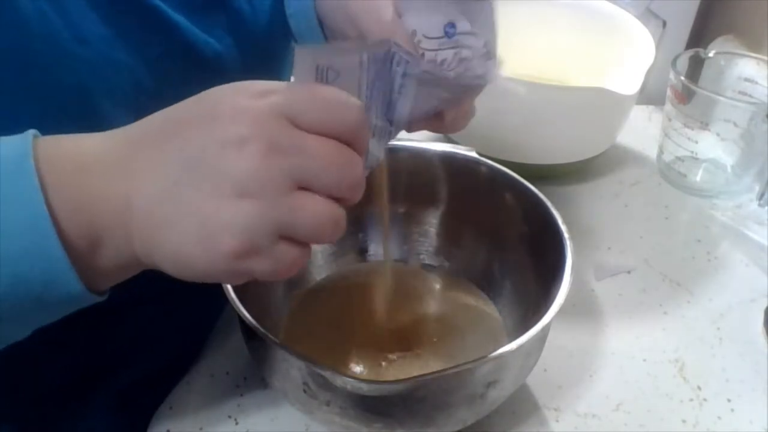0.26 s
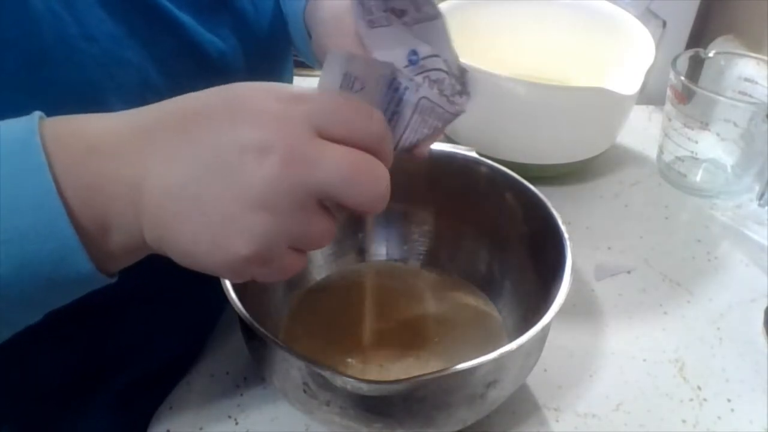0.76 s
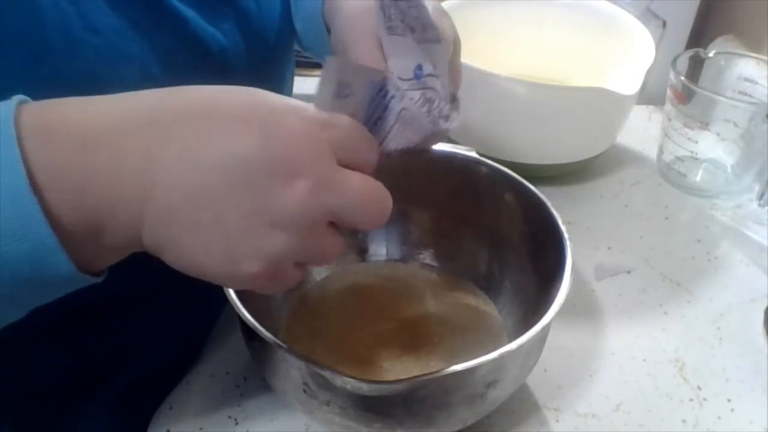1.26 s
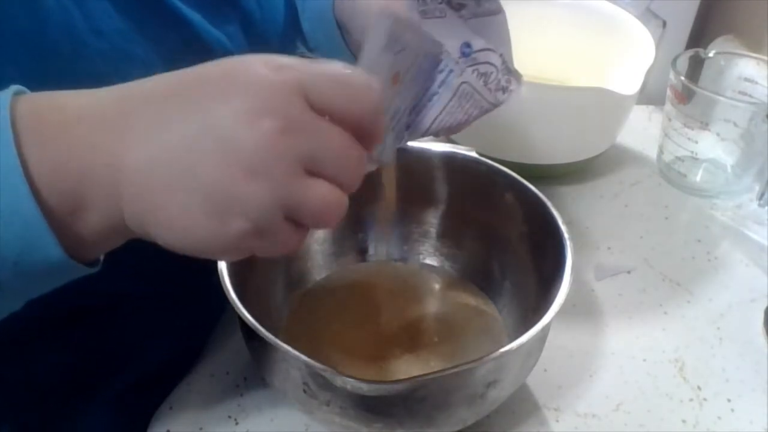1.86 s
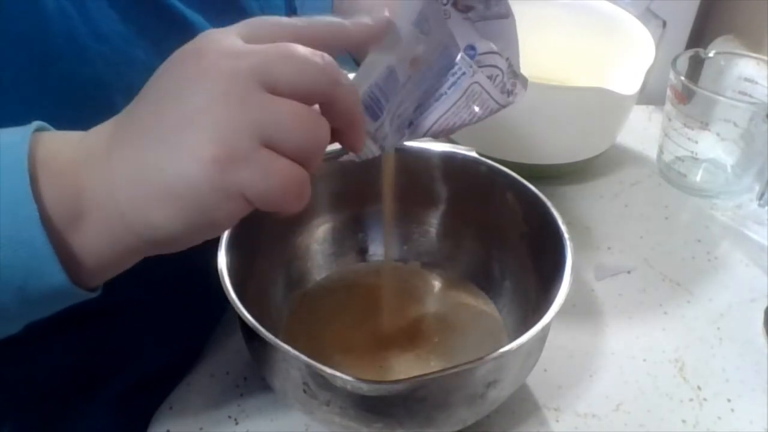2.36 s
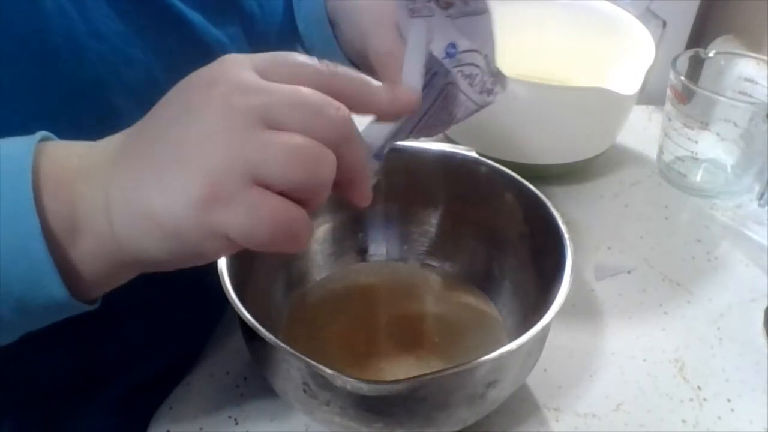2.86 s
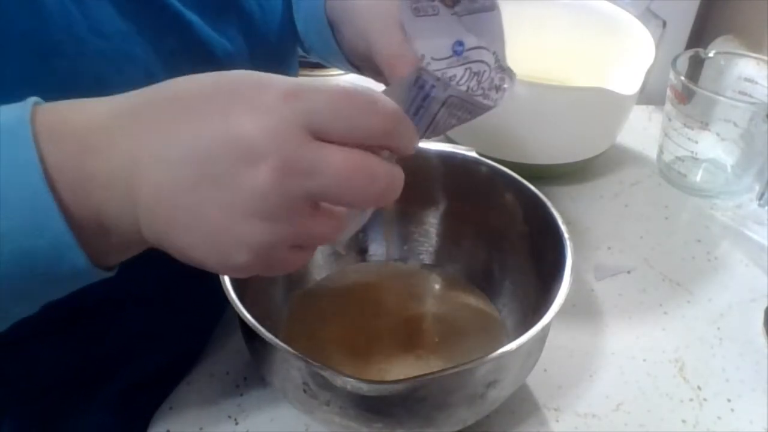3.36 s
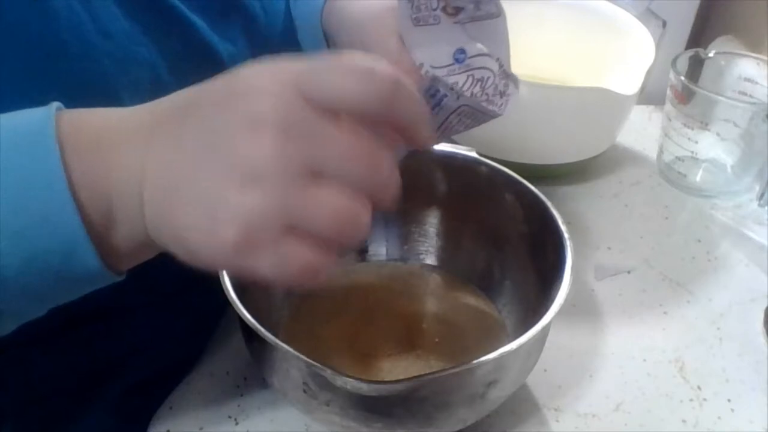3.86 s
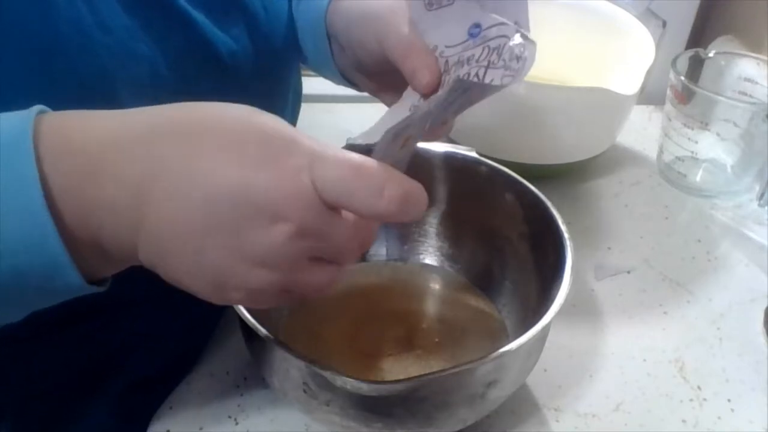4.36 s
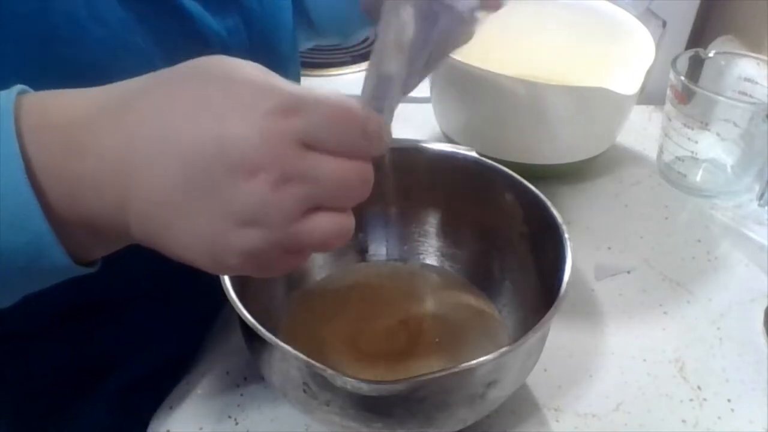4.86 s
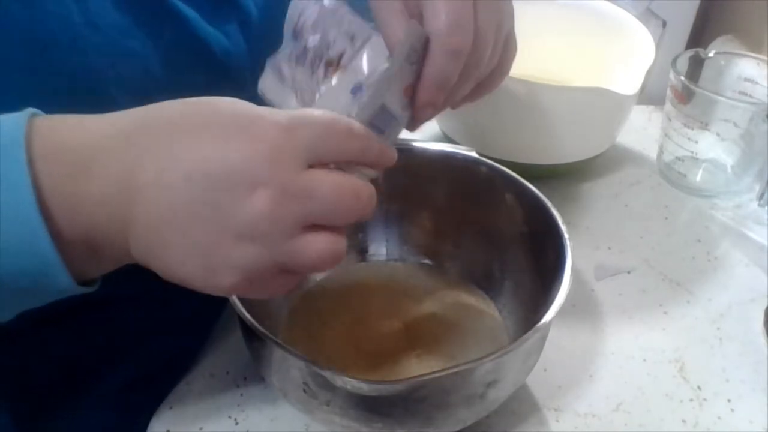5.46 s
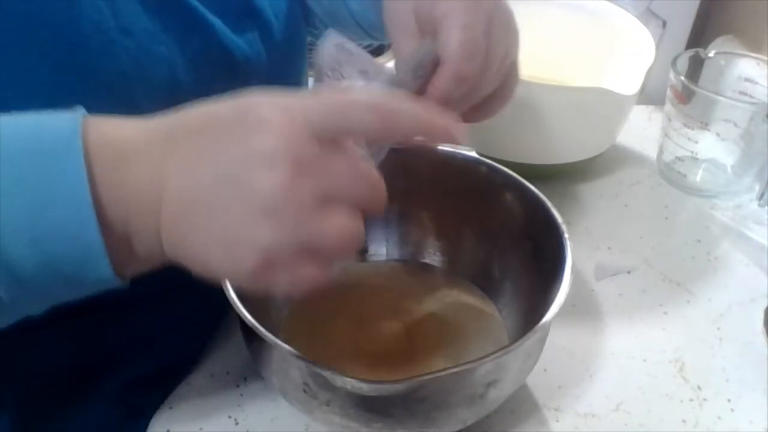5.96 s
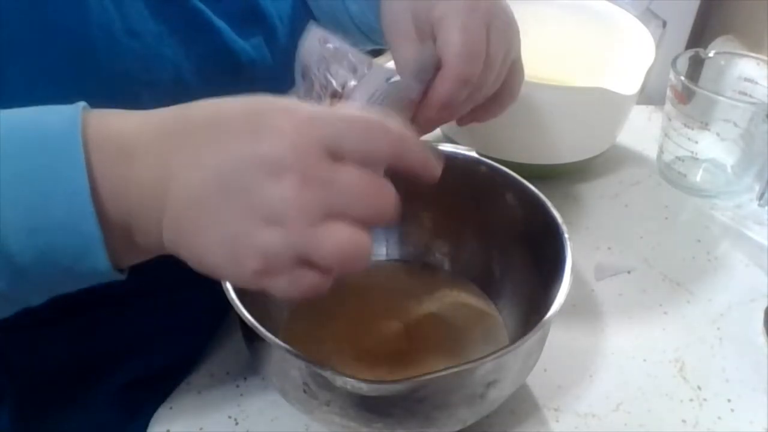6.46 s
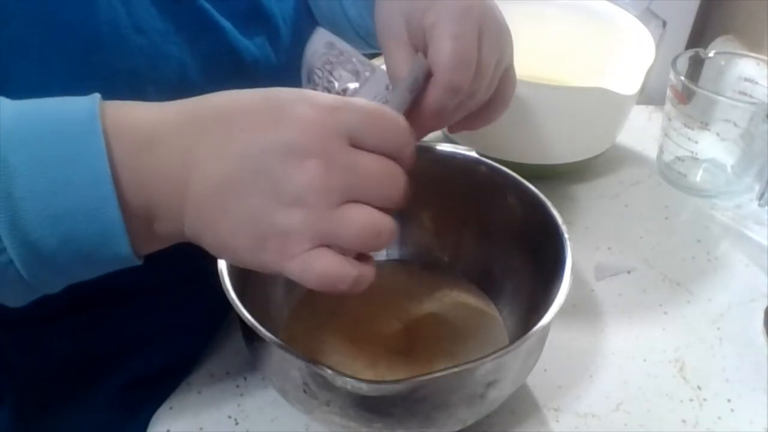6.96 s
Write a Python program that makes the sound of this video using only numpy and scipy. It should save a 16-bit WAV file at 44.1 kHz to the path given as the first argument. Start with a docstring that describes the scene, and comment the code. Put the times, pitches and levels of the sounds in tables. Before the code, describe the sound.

A paper packet is emptied over a steel bowl in a quiet kitchen, heard close through a microphone with no extreme highs. From 0 to 0.8 seconds crisp snaps crowd together over a fine hiss of falling granules, with a fleeting metallic tone cluster near 0.15 and a hollow pop at 0.3. Ticks thin out after 1.1, leaving faint hiss and rubbing. At 2 to 2.7 soft low finger bumps mix with sharp snaps, the loudest at 2.65 with a hollow pop. Scattered crackles run from 2.9 to 3.7, then it is nearly quiet until 4.9, apart from light rubbing around 4.2. From 5 the packet crumples, denser and softer from 5.4 to 6.1, with bumps near 5.9. At 6.35 a thud and crackle leave a tiny bowl ring around 1.2 kilohertz. Smaller crackles and rubs continue past 7 over faint low room noise.

```python
"""In a small kitchen, a paper yeast packet is squeezed empty over a steel mixing bowl, above faint room noise.
Each crease is noise and tiny clicks that swell quickly, snap and settle, coloured by the hollow of packet and bowl.
Squeezes swell filtered noise into rubbing and set off small folds at random; granules trickle as a dense,
faint hiss of tiny clicks. Decaying sines make the sides pop through and the steel rim sing once, a short
cluster of inharmonic sines swells and fades, and low noise puffs are fingers bumping the packet."""
import sys
import numpy as np
from scipy import signal
from scipy.fft import rfft, irfft
from scipy.io import wavfile
from scipy.ndimage import uniform_filter1d

SR = 44100
rng = np.random.default_rng(int(sys.argv[2]) if len(sys.argv) > 2 else 0)


def to_wav(sig):
    """Store sig (one row per channel, or 1-D mono) as 16-bit WAV at the path in sys.argv[1].

    Samples outside -1..1 are clipped; the rate is SR.
    """
    pcm = np.clip(np.atleast_2d(sig), -1, 1) * 32767
    pcm = np.round(pcm).astype(np.int16)
    wavfile.write(sys.argv[1], SR, pcm.T)  # frames by channels


N = 317696
TIME = np.arange(N) / SR
CRUMPLED_S = 4.7  # from here on the packet is crumpled
HOLD_DB = -77  # least effort: fingers never quite rest on the paper


def undb(db):
    """Decibels to gain."""
    return 10 ** (np.asarray(db) / 20)


def unit(x):
    """Scale to an rms of one."""
    return x / np.sqrt(np.mean(x ** 2) + 1e-30)


def band(x, lo_hz, hi_hz, order=3):
    """Causal band-pass."""
    sections = signal.butter(order, [lo_hz, min(hi_hz, .45 * SR)], "band", fs=SR, output="sos")
    return signal.sosfilt(sections, x)


def add(track, s, sound):
    """Mix a sound into a track from time s on."""
    start = int(round(s * SR))
    lo, hi = max(start, 0), min(start + len(sound), N)
    track[lo:hi] += sound[lo - start:hi - start]


def walk(rate_hz):
    """Slow random drift with an rms of one: held random steps, smoothed into ramps."""
    hold = int(SR / rate_hz)
    steps = np.repeat(rng.standard_normal(N // hold + 1), hold)
    return unit(uniform_filter1d(steps, hold)[:N])


def grains(shape, per_s, spread_db):
    """Random tiny clicks, mostly small, now and then large."""
    sizes = undb(spread_db * np.minimum(rng.exponential(size=shape), 4))
    strikes = rng.random(shape) < per_s / SR
    return unit(rng.standard_normal(shape) * sizes * strikes)


# spectrum of the quiet kitchen: (frequency [Hz], relative density [dB per Hz])
ROOM_SPECTRUM = [(15, -30), (25, -7), (150, -7), (314, -20), (556, -11), (759, -24), (815, -10.5),
                 (986, -28), (1220, -15.5), (1550, -29), (1710, -22), (2170, -23), (7500, -34), (9750, -87),
                 (16500, -120)]


def kitchen(level_db=-73, waver_db=0.2):
    """Steady room noise, shaped in frequency, whose level wavers a little."""
    hz, db = np.transpose(ROOM_SPECTRUM)
    bins = np.maximum(np.fft.rfftfreq(N, 1 / SR), 1)
    colour = undb(np.interp(np.log(bins), np.log(hz), db))
    noise = irfft(rfft(rng.standard_normal(N)) * colour, N)
    return unit(noise) * undb(level_db + waver_db * walk(23))


def walls(x, t60_s=0.11, wet_db=-25, dull_hz=3500):
    """A short, dull kitchen echo: the sound is smeared by a decaying tail of noise."""
    t = np.arange(SR // 2) / SR
    noise = band(rng.standard_normal(len(t)), 150, dull_hz, order=1)
    tail = noise * undb(-60 * t / t60_s) * (t > .008)
    return undb(wet_db) * signal.fftconvolve(x, tail / np.linalg.norm(tail))[:N]


def rim(s=6.346, hz=1165, level_db=-53, t60_s=0.4):
    """A finger grazes the rim and one mode of the steel bowl sings briefly."""
    t = np.arange(SR // 2) / SR
    out = np.zeros(N)
    add(out, s, undb(level_db - 60 * t / t60_s) * np.sin(2 * np.pi * hz * t))
    return out


# soft bumps of the fingers on the packet: (time [s], peak level [dB])
FINGER_BUMPS = [(2, -52.5), (2.156, -49), (2.228, -62), (2.307, -48.5), (2.334, -67), (2.653, -59.5),
                (2.932, -55), (3.345, -61), (5.895, -49), (5.932, -55), (6.008, -62), (6.344, -53),
                (6.553, -57)]


def bumps(rise_s=0.0038, fade_s=0.012):
    """A fingertip pushes the packet's flat side: a soft, low puff."""
    t = np.arange(SR // 6) / SR
    swell = (1 - np.exp(-t / rise_s)) * np.exp(-t / fade_s)
    out = np.zeros(N)
    for s, peak_db in FINGER_BUMPS:
        puff = band(rng.standard_normal(len(t)) * swell, 71, 180, order=2)
        add(out, s - rise_s, undb(peak_db) * puff / abs(puff).max())
    return out


# sines of the brief tone cluster: (frequency [Hz], relative level [dB])
CLUSTER_TONES = [(370, -59.5), (786, -60.5), (1464, -54), (1863, -55.5), (3935, -52.5), (4840, -56.5),
                 (7020, -58.5)]


def brief_tones(s=0.1453, half_s=0.017, gain_db=3, waver=0.0041):
    """A short cluster of inharmonic sines swells and fades, its pitches all but steady."""
    swell = np.exp(-((TIME - s) / half_s) ** 2)
    turns = np.cumsum(1 + waver * walk(100)) / SR
    tones = sum(np.sqrt(2) * undb(db + gain_db) * np.sin(2 * np.pi * hz * turns)
                for hz, db in CLUSTER_TONES)
    return swell * tones


# a whole side pops through: (time [s], pitch [Hz], level before rise and decay [dB])
SIDE_POPS = [(0.296, 520, -35.5), (0.622, 518, -45.5), (2.333, 520, -49), (2.398, 420, -51),
             (2.647, 335, -32), (3.203, 332, -50.5), (5.924, 400, -41)]


def pops(rise_s=0.0026, t60_s=0.055):
    """The air in the packet rings at a pitch set by how far it is pinched."""
    t = np.arange(SR // 6) / SR
    rise = 1 - np.exp(-t / rise_s)
    out = np.zeros(N)
    for s, hz, db in SIDE_POPS:
        add(out, s, undb(db - 60 * t / t60_s) * rise * np.sin(2 * np.pi * hz * t))
    return out


# resonances of packet and bowl: (frequency [Hz], width before the fade window [Hz],
# relative level while open [dB], relative level once crumpled [dB])
RESONANCES = [(357, 51, -5, -0.5), (446, 98, -3.5, -2.5), (530, 120, -1.5, -2), (1073.6, 43, -2, -1.5),
              (1182, 84, -7, -4), (1287.5, 49, -3.5, 0), (1456, 48, -4.5, 5), (1518, 28, -2.5, 0),
              (1910, 12, -6, 2), (2050, 46, -4, -12), (2223, 130, 3, -12), (2328, 110, 3, 7.5),
              (2932, 190, 2, -2), (3107, 45, 1.5, 7), (3241, 59, -4, -3.5), (3895, 49, 3.5, 0),
              (4080, 24, 2, -4), (4222, 59, 2, -2), (4354, 10, -7.5, -1), (4570, 71, -4.5, -2.5),
              (4960, 18, -5, 2.5), (4960, 71, -2.5, -7.5), (5264, 130, -1, -6.5), (5420, 72, -3, 0.5),
              (5690, 66, -3.5, -11.5), (6022, 34, 2, -0.5), (6540, 46, -2.5, -1), (6520, 21, -1.5, -0.5),
              (7060, 99, -13.5, -9.5), (7330, 40, -6.5, -3.5)]


def hollow(x, when, direct_db, linger_db=-27, linger_s=.014, window_s=.024):
    """Packet and bowl ring briefly and some sound passes them by; crumpling reweights the resonances."""
    t = np.arange(SR // 10) / SR
    hz, width, *shapes_db = np.transpose(RESONANCES)[:, :, None]
    fade = np.exp(-np.pi * width * t) + undb(linger_db) * np.exp(-t / linger_s)
    window = np.exp(-(t / window_s) ** 2)  # rings die away within a few hundredths of a second
    modes = 2 * np.pi * width / SR * np.cos(2 * np.pi * hz * t) * fade * window
    heard = []
    for db in shapes_db:
        response = (undb(db) * modes).sum(axis=0) + undb(direct_db) * (t == 0)
        ringing = signal.fftconvolve(x, np.array(response, ndmin=x.ndim), axes=-1)
        heard.append(ringing[..., :x.shape[-1]])
    opened, crumpled = heard
    return np.where(when < CRUMPLED_S, opened, crumpled)


# squeezes, paper sliding on paper: (middle [s], half length [s],
# relative fine grain level [dB], relative hollow rubbing level [dB])
HAND_SQUEEZES = [(0.234, .06, -48, -64.5), (0.66, .13, -66, -69), (1.076, .035, -54, -77),
                 (1.861, .04, -78, -71), (2.456, .05, -56.5, -66.5), (2.672, .075, -58, -64),
                 (3.048, .07, -73, -64), (3.276, .1, -63.5, -62), (4.154, .22, -77.5, -70),
                 (4.322, .05, -68.5, -72), (5.457, .08, -56, -59.5), (5.703, .08, -59, -60),
                 (5.955, .055, -48, -62.5), (6.351, .05, -64, -57.5), (6.701, .22, -70, -70),
                 (6.902, .04, -72, -65), (7.193, .06, -57, -68.5)]


def squeezing():
    """Each squeeze swells and dies away; gives the strength of its fine grain and of its hollow rubbing."""
    grain, rub = np.zeros(N), np.zeros(N)
    for s, half_s, grain_db, rub_db in HAND_SQUEEZES:
        swell = np.exp(-((TIME - s) / half_s) ** 2)
        grain += undb(grain_db) * swell
        rub += undb(rub_db) * swell
    return grain, rub


# yeast granules sliding out of the packet: (time [s], relative level [dB])
GRANULE_POUR = [(0, -57), (0.5, -70), (1.1, -73), (1.5, -68), (2.05, -72), (2.9, -74), (3.8, -73.5),
                (4.7, -78.5), (6.2, -73), (7.2, -80)]


def rustle(grain, rubbing, fine_db=-3, rub_db=-1, skin_db=-5):
    """Paper rubs and granules slide out in uneven spurts, whose colour shifts as the paper bends."""
    pour = undb(np.interp(TIME, *np.transpose(GRANULE_POUR)))
    spurts_db = 2.5 * walk(30)
    shift_db, grip_db = 2.5, 4.5
    # a dense, grainy hiss of tiny clicks
    granules = hollow(grains(N, per_s=3500, spread_db=2), TIME, direct_db=-16)
    fine = sum(band(granules, lo, hi) * undb(shift_db * walk(30))
               for lo, hi in [(900, 1000), (1850, 2000), (3800, 7700)])
    # the shifting grip lets now one, now another of the low resonances speak
    friction = hollow(rng.standard_normal(N), TIME, direct_db=-16.5)
    # (low edge [Hz], high edge [Hz], relative level [dB])
    lows = [(296, 385, 0.0055), (348, 620, 0.0023), (500, 700, 0.0043), (824, 1300, skin_db)]
    rub = sum(band(friction, lo, hi) * undb(db + grip_db * walk(22)) for lo, hi, db in lows)
    fine_strength = np.hypot(grain, pour) * undb(fine_db + spurts_db)
    rub_strength = np.hypot(rubbing, undb(HOLD_DB)) * undb(rub_db + spurts_db)
    return unit(fine) * fine_strength + unit(rub) * rub_strength


def small_creases(grain, rub, level_db=1, scatter_db=3, size_db=-2, bright_db=-3, lead_db=-5, count=56):
    """Small folds give way at random, more often and louder the harder the packet is squeezed."""
    effort = np.hypot(grain, rub) + undb(HOLD_DB)
    due = np.cumsum(effort ** .7)  # the power sets how steeply the rate grows with effort
    at = np.searchsorted(due / due[-1], (np.arange(count) + rng.random(count)) / count)
    typical = np.array([level_db, size_db, bright_db, lead_db])
    traits = typical + scatter_db * rng.standard_normal((count, 4))
    levels_db = 20 * np.log10(effort[at]) + traits[:, 0]
    return np.column_stack([TIME[at], levels_db, traits[:, 1:]])


def folds(x, ring_db=-29, ring_s=.0033, count=12):
    """Every fold has a shape of its own, and so its own few short modes."""
    t = np.arange(SR // 30) / SR
    chance = rng.random((len(x), count, 2, 1))
    hz = 300 + 7200 * (np.arange(count)[:, None] + chance[:, :, 0]) / count
    modes = (2 * chance[:, :, 1] * np.cos(2 * np.pi * hz * t)).sum(axis=1) * np.exp(-t / ring_s)
    response = (t == 0) + undb(ring_db) * modes
    return signal.fftconvolve(x, response, axes=1)[:, :x.shape[1]]


def reshape_packet(x, t, detune=.012):
    """The packet's shape differs slightly at every crease, so its resonances sit a little higher or lower."""
    stretch = 1 + detune * rng.standard_normal(len(x))
    return np.array([np.interp(t * k, t, row) for row, k in zip(x, stretch)])


# creases that snap: (time [s], level at 2-3.5 kHz [dB], size of the flipping panel [dB],
# brightness [dB], level of the swell before the snap [dB]); the last three are relative to the level
SNAPPING_CREASES = [(0.005, -43.5, -1.5, 6, -4.5), (0.014, -47, 2, 2.5, -10), (0.102, -37, -3.5, -4.5, -10),
                    (0.176, -40, -13, 2, -16), (0.189, -42.5, -5.5, -2.5, -17), (0.218, -39, -0.5, 1, 2),
                    (0.243, -32.5, -6.5, -6.5, -14), (0.294, -36.5, -1, -0.5, -6),
                    (0.366, -65.5, 8, -24, -23), (0.471, -41, -4, -12, -17), (0.485, -40.5, -6, -8, 1),
                    (0.559, -64, -14, 3, 3), (0.624, -52.5, -8, -4.5, -9), (0.675, -37.5, -15, 7, -13),
                    (0.713, -56, 4.5, -18, -27), (0.767, -62.5, -1, 5.5, -11), (0.79, -52.5, -6, -0.5, -6),
                    (0.846, -41.5, -12.5, -20, -12), (0.96, -65, 8.5, -30, -14), (1.018, -45, -5, 0, -13),
                    (1.088, -46, -14.5, 3, 6), (1.111, -46, -3, 7, -5), (1.463, -56.5, -10, 8.5, -18),
                    (1.812, -65.5, -3.5, -21, 1), (1.987, -54, -5.5, -4, -2),
                    (2.012, -48.5, -8.5, -4.5, 8.5), (2.163, -36.5, -8.5, -4, -6.5),
                    (2.177, -50, -4, 4, 10), (2.229, -34.5, -6.5, 7.5, -13.5), (2.311, -44, -13, -6, -4.5),
                    (2.333, -37, -5, 10, -1.5), (2.397, -47.5, 1.5, -4.5, -28),
                    (2.451, -58, -2.5, -11, 12.5), (2.477, -58, -16, -0.5, 5.5),
                    (2.525, -55.5, -32, 7.5, -10), (2.647, -28, -5.5, 4, -8), (2.717, -49.5, -2, 9, -3),
                    (2.942, -54.5, -2.5, 6, 6), (3.061, -46, -0.5, 2.5, 1.5), (3.102, -59.5, -0.5, 5, 11),
                    (3.183, -40, -10, -7, -20.5), (3.202, -46.5, -3, 8, -3), (3.257, -59.5, -7, 1.5, -13),
                    (3.299, -50, -7.5, -12, -4), (3.32, -55.5, 0, 3, 9), (3.348, -40.5, -13, -6.5, -12),
                    (3.384, -47, -3.5, -0.5, 8.5), (3.407, -58, -6.5, 2, 9), (3.5, -59.5, -3, -6.5, -8),
                    (3.548, -68, 6.5, -1.5, 1), (3.629, -36, -14, 0, -14), (3.706, -42, -4, -2, -1),
                    (3.844, -54, -4, -3, -5), (3.939, -67, 1, 3.5, -11), (4.02, -62, -14.5, 1, 8.5),
                    (4.252, -55.5, -1, -13, 3.5), (4.28, -52.5, 0, -2, 0), (4.903, -64, 3.5, -3, -9.5),
                    (4.997, -48, -7, 2.5, -9.5), (5.035, -50, 0.5, -2, -6), (5.055, -54.5, -0.5, 4.5, 3),
                    (5.116, -60.5, 1.5, 1.5, 1), (5.191, -71, 8, -13.5, -18), (5.24, -64, 6, 6, -7),
                    (5.364, -55.5, -0.5, 6.5, -1), (5.385, -50.5, 5, -0.5, 12.5), (5.394, -46, -1, 0, -20),
                    (5.436, -58, 3.5, 15.5, 10.5), (5.499, -52.5, -1.5, 3, -8), (5.562, -43.5, -3, -7, 8),
                    (5.6, -57.5, -1, 0.5, 10), (5.654, -43.5, -3, 4, 0.5), (5.669, -45, -1.5, -5, -31),
                    (5.687, -55, 2, -3, 6), (5.76, -53.5, -7, 6, -8), (5.777, -41.5, -2, 2, 9),
                    (5.839, -54.5, -0.5, -18, -6), (5.886, -44, -4.5, 1.5, -7),
                    (5.903, -37.5, -6.5, -2.5, 2), (5.927, -47.5, 2.5, 2.5, 9), (5.982, -50.5, -6, 3, -1),
                    (6.011, -43.5, 1.5, 0.5, 5), (6.053, -61.5, 6, 0.5, 7), (6.171, -46, -4.5, 2, -1),
                    (6.306, -47.5, 3, -12.5, -4.5), (6.346, -39.5, -2.5, 2.5, 3.5),
                    (6.478, -57.5, 2.5, -4, 10), (6.493, -53, 0.5, -8, -2), (6.552, -37.5, -4, 1, 1.5),
                    (6.588, -48, -20, 8, 10), (6.677, -57, -6.5, -15, -1), (6.756, -56, -3, -6, -4.5),
                    (6.774, -53, -6.5, 1.5, -1), (6.799, -46, -14.5, -0.5, -5),
                    (6.894, -50.5, -1, -6.5, -1), (7.049, -49.5, -1.5, 4, -8), (7.104, -57.5, -0.5, 1, 8),
                    (7.142, -50.5, -5.5, 7, -3.5), (7.165, -49, -7, 8, -6)]


def creases(rows, snap_s=0.00089, crush_s=0.0062, settle_db=-9, swell_db=-3, click_db=11):
    """A quick swell of tiny clicks leads into each snap, then the fold settles; soft folds crush more slowly."""
    s, level_db, size_db, treble_db, lead_db = np.transpose(rows)[:, :, None]
    # a wide panel pumps the air in the packet, which gives body
    body_db = -10 + 1.7 * size_db + 0.84 * treble_db
    panel_db = size_db + 2 * (s > CRUMPLED_S)  # the crumpled packet speaks more at 1-1.5 kHz
    t = np.arange(-SR // 25, SR // 10) / SR  # the snap is at zero
    before, after = t < 0, t >= 0
    shape = (len(s), len(t))
    swell_s, give_s, settle_s, tail_s = 0.0065, .0035, 0.0062, .016
    soft_from_db, give_db, tail_db = -6, -1, -44
    soft = 1 / (1 + undb(2 * (soft_from_db - lead_db)))  # 0 stiff, 1 soft
    swell = undb(lead_db + swell_db) * np.exp(-abs(t) / swell_s) * before
    give = soft * undb(give_db) * np.exp(-abs(t) / give_s) * before
    fall = np.exp(-abs(t) / ((1 - soft) * snap_s + soft * crush_s)) * after
    settle = undb(settle_db) * np.exp(-abs(t) / settle_s) * after
    tail = undb(tail_db) * np.exp(-abs(t) / tail_s) * after
    click = (1 - soft) * undb(click_db) * (t == 0)
    snap = (give + fall) * rng.standard_normal(shape) + click
    clicks = grains(shape, per_s=3500, spread_db=2)
    paper = hollow(folds(snap + (swell + settle + tail) * clicks), s, direct_db=-25.5)
    paper = reshape_packet(paper, t)
    # wide panels give body, tight folds give treble; the strength is that of the first moments
    first = after & (t < .008)
    parts = [(band(paper, 280, 620), body_db), (band(paper, 876, 1620), panel_db),
             (band(paper, 1850, 3360), 0), (band(paper, 3750, 7800), treble_db)]
    sounds = sum(p * undb(level_db + db) / p[:, first].std(axis=1, keepdims=True) for p, db in parts)
    out = np.zeros(N)
    for when, sound in zip(s[:, 0], sounds):
        add(out, when + t[0], sound)
    return out


def scene():
    """Packet, bowl and room at one microphone."""
    grain, rub = squeezing()
    crackle = creases(np.vstack([SNAPPING_CREASES, small_creases(grain, rub)]))
    near = rim() + bumps() + brief_tones() + pops() + rustle(grain, rub) + crackle
    return (kitchen() + walls(near) + near)[None]


def record(dry, top_hz=7500, hiss_db=-96):
    """A narrow-band microphone cuts the top steeply; the electronics add a trace of hiss."""
    voiced = signal.sosfilt(signal.ellip(12, .2, 70, top_hz, fs=SR, output="sos"), dry)
    hiss = undb(hiss_db) * rng.standard_normal(dry.shape)
    return signal.sosfilt(signal.ellip(8, .2, 70, 15700, fs=SR, output="sos"), voiced + hiss)


dry = scene()
out = record(dry)
to_wav(out)
```